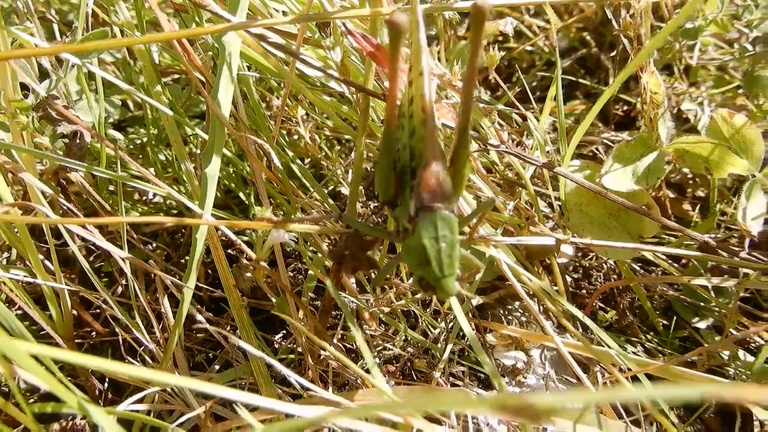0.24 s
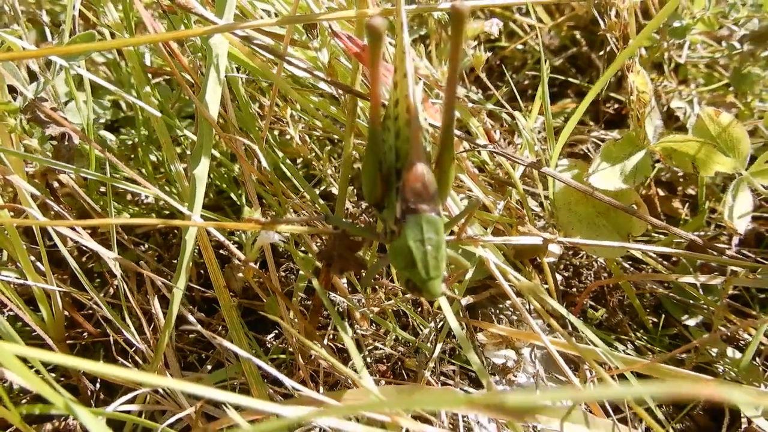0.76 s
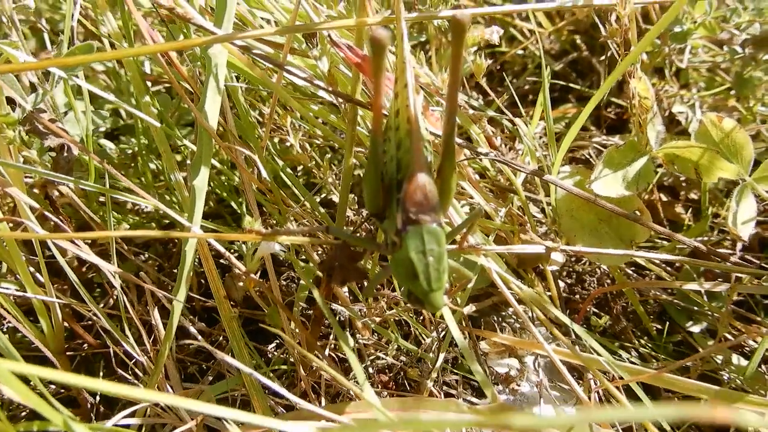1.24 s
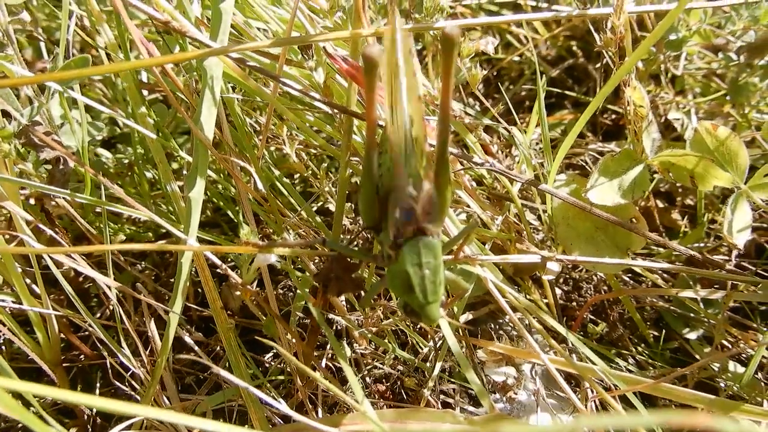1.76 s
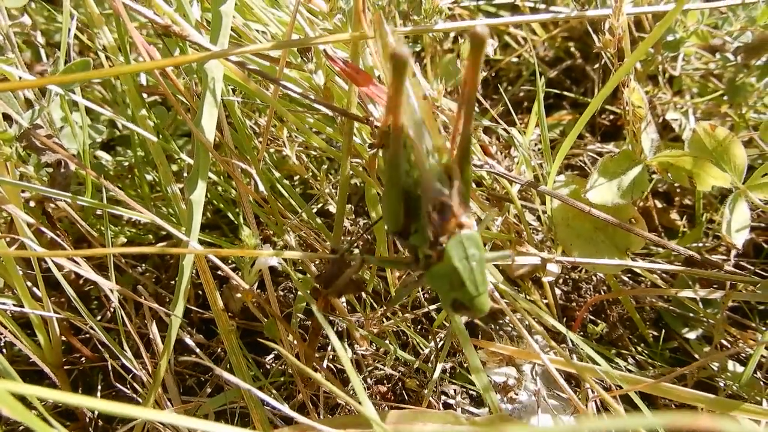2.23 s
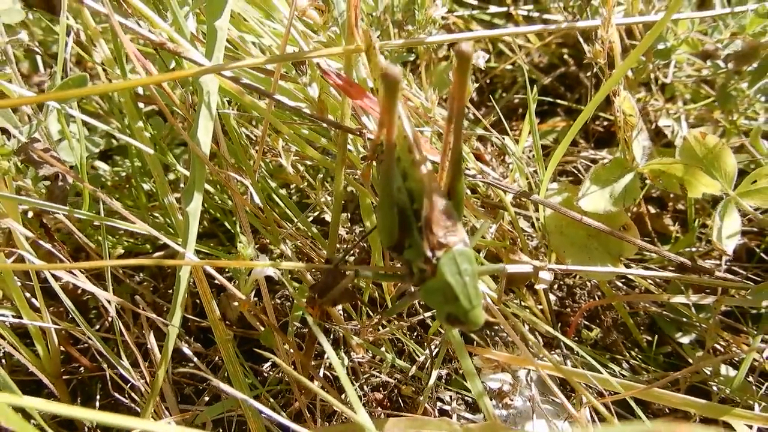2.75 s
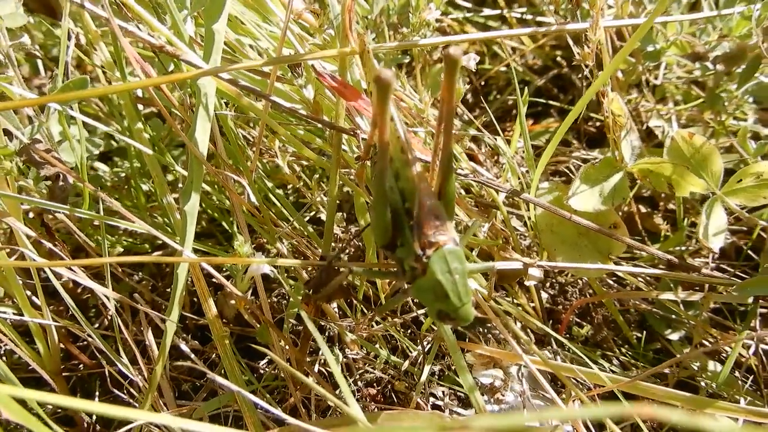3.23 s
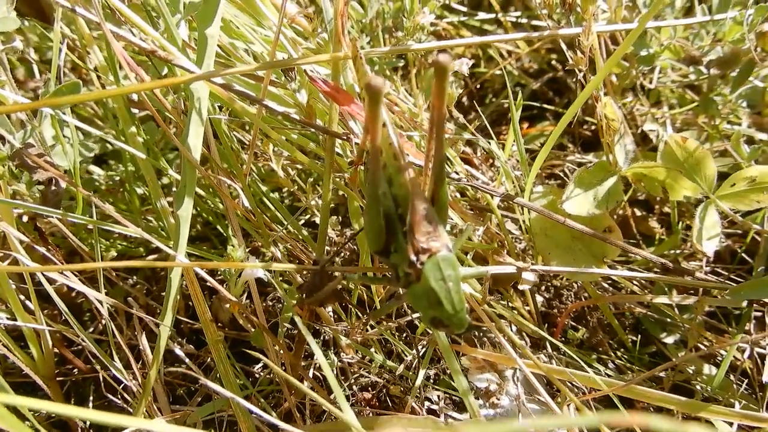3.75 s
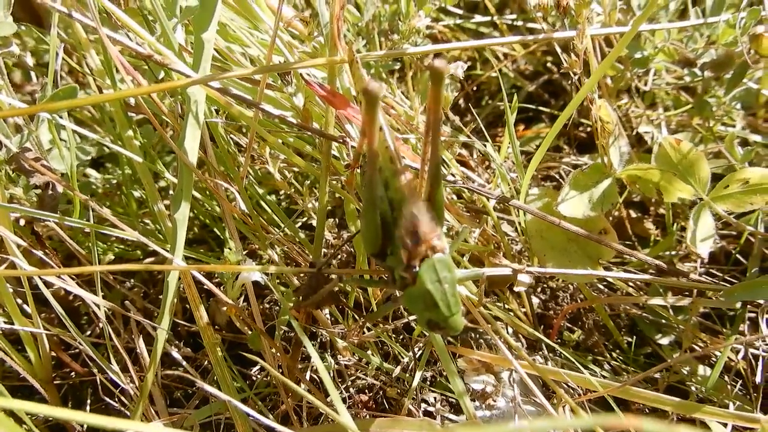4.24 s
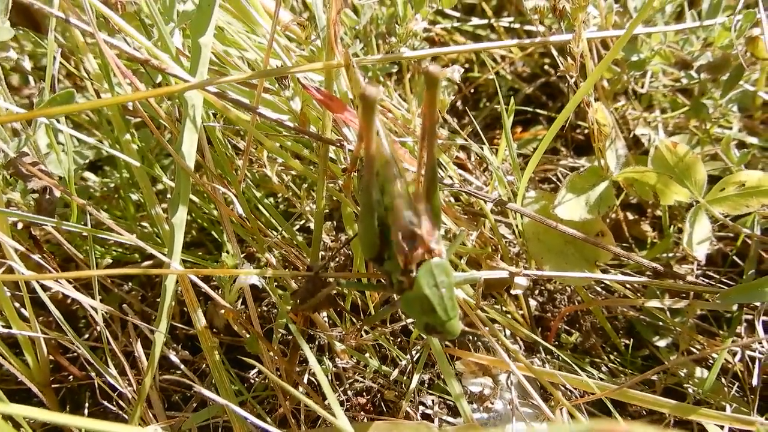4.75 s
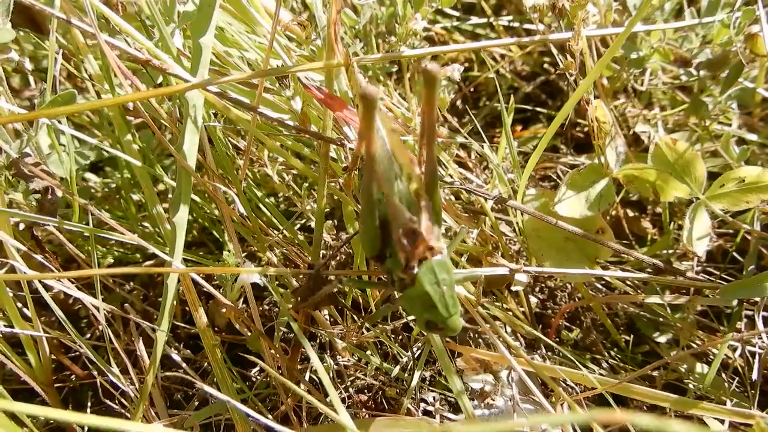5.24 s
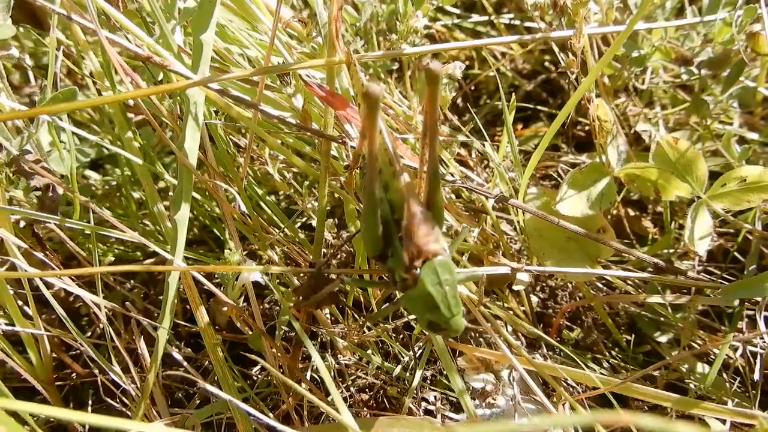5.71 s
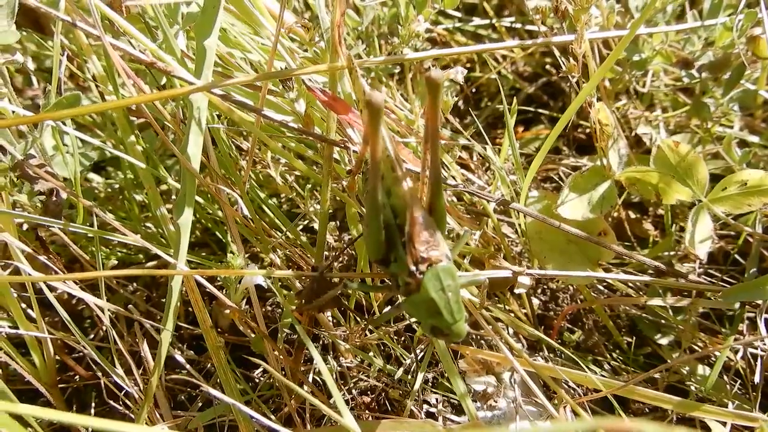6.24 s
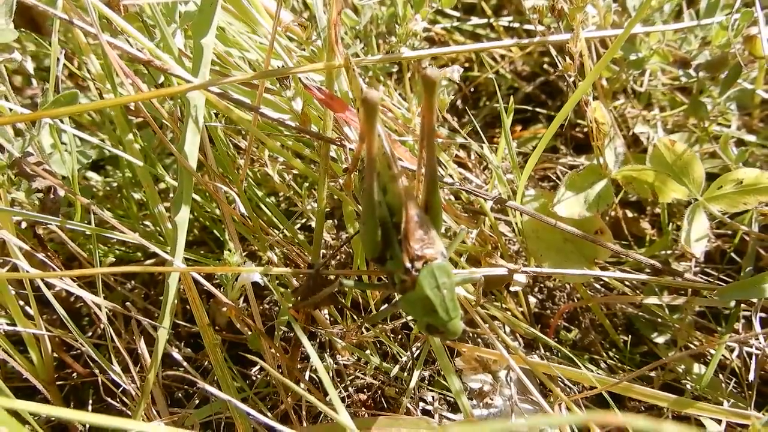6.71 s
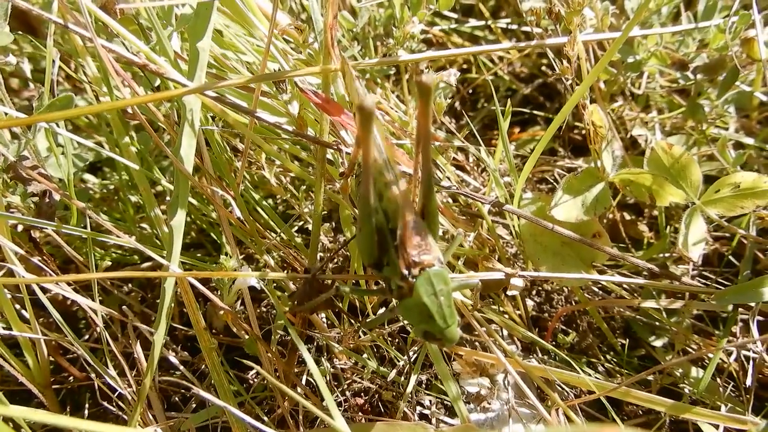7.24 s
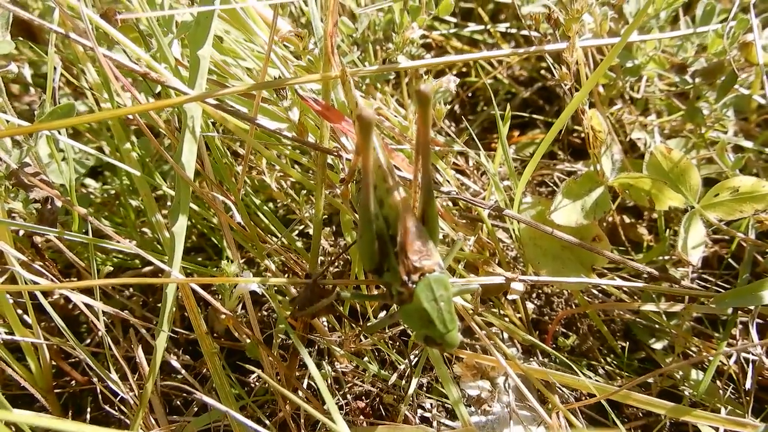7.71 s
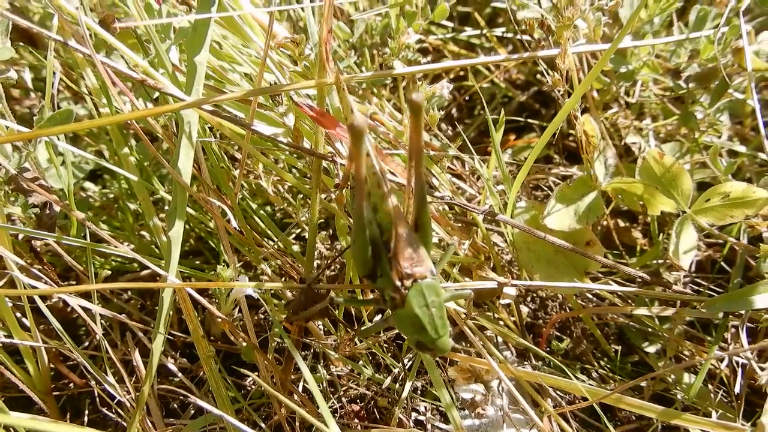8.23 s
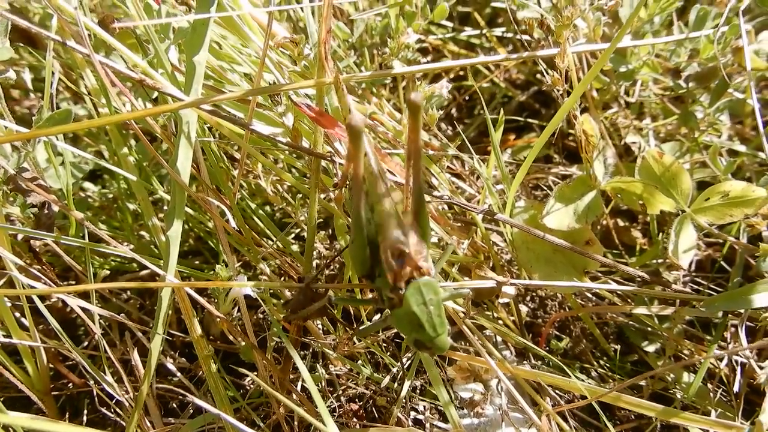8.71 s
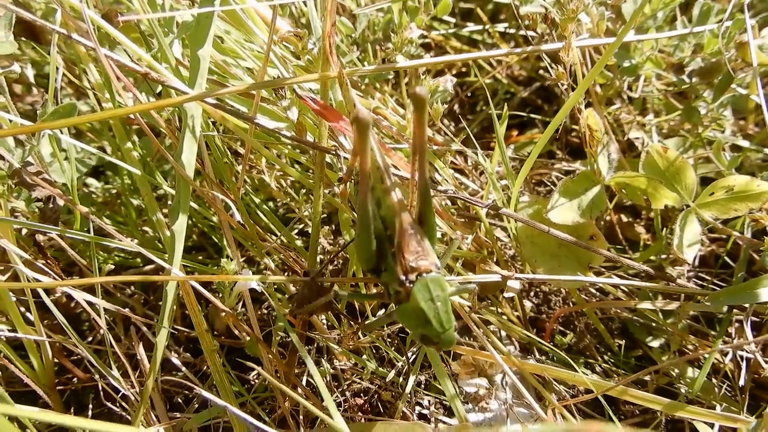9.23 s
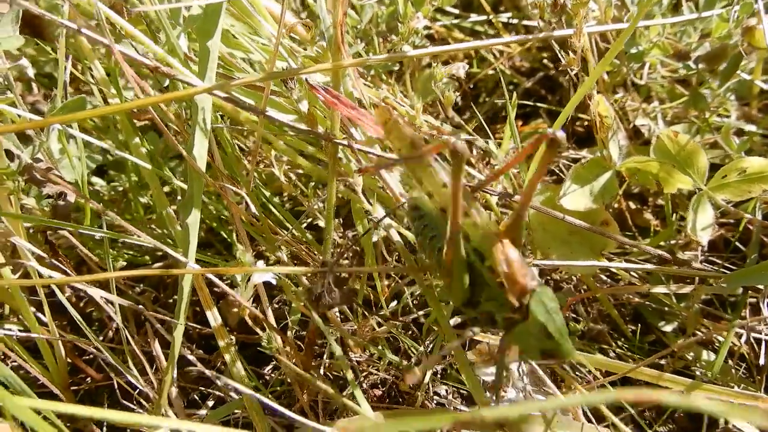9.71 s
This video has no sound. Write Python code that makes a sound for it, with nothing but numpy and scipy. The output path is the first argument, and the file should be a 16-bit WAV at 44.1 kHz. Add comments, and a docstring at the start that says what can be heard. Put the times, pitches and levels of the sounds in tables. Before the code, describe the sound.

Quiet open meadow, heard from very near the grass. After a sliver of silence, a short muffled rush of noise lasts until about 0.3 s, with a few tiny ticks and the first chirp near 0.26 s. A bush-cricket then chirps singly at 0.9, 1.1 and 1.5 s, each a very short, dry, noisy tick of very high pitch with a soft catch just before it. From 1.7 to 4 s the chirps draw together, from about five to seven a second; by 6 s they form a steady pulse of nearly nine a second, slightly varied in loudness. At 5.8 s a hard double crack snaps on the right, coinciding with a chirp. The pulse continues, with faint dry rasping between strokes, slowing slightly and softening by 9.8 s. Underneath, faint breeze gusts early and calms, while a distant engine hum swells slightly around 3 s.

```python
"""Bush-cricket in dry grass

Single chirps quicken to about nine a second: toothed-file stridulation, a soft opening and a loud closing.
Each tooth impulse excites the resonant wing; air puffs, dry rasps and grass scattering accompany the song.
A short noise rush starts the scene, and a clipped crack on the right coincides with one chirp.
Filtered noise gives the breeze and distant air; a wavering sinusoid gives a far engine."""
import sys
import numpy as np
from scipy import signal
from scipy.fft import rfft, irfft, next_fast_len
from scipy.io import wavfile
from scipy.ndimage import uniform_filter1d, map_coordinates

SR = 44100
rng = np.random.default_rng(int(sys.argv[2]) if len(sys.argv) > 2 else 0)


def transcribe(signal):
    """Save signal, clipped to [-1, 1], as a 16-bit WAV file at the path in sys.argv[1]."""
    frames = np.atleast_2d(signal).T
    limited = np.clip(frames, -1, 1)
    pcm = np.round(limited * 32767).astype(np.int16)
    wavfile.write(sys.argv[1], SR, pcm)


N = 439677
START_S = .06  # onset of the audible scene

# one wing cycle per chirp: t/s of the main closing stroke, level/dB before the closing gain
CHIRP_TIMES = [(0.2571, -19.5), (0.8869, -20.5), (1.1205, -21.5), (1.5469, -20.5), (1.741, -20),
               (1.9367, -21.5), (2.154, -20.5), (2.4151, -23.5), (2.589, -22.5), (2.811, -22),
               (2.9701, -21.5), (3.1294, -23.5), (3.2972, -21.5), (3.435, -23), (3.5806, -24),
               (3.723, -25.5), (3.8688, -23), (4.0062, -24), (4.1473, -23.6), (4.2884, -21.5),
               (4.4299, -21.5), (4.579, -23), (4.6993, -25), (4.8253, -23), (4.948, -23.5), (5.072, -21.5),
               (5.1886, -22.5), (5.3114, -23.0), (5.4247, -24.0), (5.5478, -21.5), (5.6737, -24),
               (5.7977, -22), (5.9131, -21), (6.0349, -24), (6.1452, -20.5), (6.2632, -23), (6.3749, -23),
               (6.4893, -23), (6.6003, -24.5), (6.7166, -23.0), (6.8287, -23.5), (6.9402, -22),
               (7.0537, -24), (7.166, -22), (7.2753, -23.5), (7.3862, -21), (7.4992, -22.5), (7.6097, -24),
               (7.7195, -22.5), (7.833, -23), (7.9417, -22.5), (8.0529, -22.5), (8.1547, -22), (8.263, -23),
               (8.3744, -23.5), (8.4769, -23.5), (8.584, -25.5), (8.6947, -21.6), (8.8021, -25.5),
               (8.9105, -24), (9.008, -21), (9.111, -22.8), (9.2235, -22.5), (9.3316, -23), (9.451, -23),
               (9.5688, -24), (9.6899, -28.5), (9.8236, -26)]
# breeze, gusting then steady, before layer gains: t/s, rumble level/dB, distant air level/dB, hiss level/dB
BREEZE_LEVELS = [(0.3, -78.5, -79, -97.5), (0.52, -79.5, -76.5, -94.5), (0.74, -77.5, -69, -83),
                 (1.08, -81.5, -76.5, -93), (1.42, -79.5, -70, -90), (2.14, -80, -76.5, -99.5),
                 (2.51, -82, -74.5, -89), (3.12, -82.5, -71.5, -83), (4.12, -84, -74.5, -87),
                 (5.2, -85, -74, -86.5)]


def cricket(cycles, opening_db=1, closing_db=-0.87, tint_db=2, lead_s=.0071, lead_length=.0031,
            main_length=0.0052):
    """Stridulation: opening catches, a short lead stroke and the main closing stroke excite the wing."""
    # catches of the file as the wings open: t/s from the strongest, length/s, relative level/dB
    catches = [(-.0195, 0.0039, -12), (-.0092, .0046, -18.5), (0, .0044, -2), (.0047, .0016, -19.5)]
    # extra wing strokes: early ticks, stray flicks and a last opening without a closing:
    # t/s, length/s, level/dB
    extra_strokes = [(.208, 0.0016, -23), (0.221, 0.0025, -22), (.836, 0.0048, -38), (0.854, .0024, -27.5),
                     (5.087, .0068, -39), (6.727, .005, -39), (7.171, 0.0042, -36), (9.115, 0.0049, -33),
                     (9.921, 0.0039, -48), (9.939, 0.0052, -35)]
    # spectrum of one tooth strike on the wing: f/Hz, level/dB
    wing_colour = [(200, -32), (400, -24.5), (750, -21.5), (1400, -36), (2200, -32), (2850, -32.5),
                   (4000, -41), (6500, -41), (8000, -23), (9500, -11.5), (10800, -2), (12300, -6),
                   (14500, 2), (15750, 1), (16050, -29.5)]
    # thinner spectrum of the opening stroke: f/Hz, level/dB relative to closing
    thin_colour = [(1000, -0.5), (7500, 6), (10500, -9), (12200, -15.5), (13500, -1.5), (16000, -1.5)]
    # shading of the highest partials in the right channel: f/Hz, level/dB
    shade = [(8000, 0), (11000, -1), (12500, -4), (14500, -11), (15800, -9)]
    song = np.zeros((2, N))
    half = .01  # s from the start of a stroke's track to its centre
    firm, soft, slow = .18, .3, .7  # bite of the scraper, as a share of stroke length
    tint_hz = np.linspace(1000, 16000, 16)
    for s, db, lead_db, before, open_db in cycles:
        # the wings never meet quite the same way twice, so each cycle has its own tint
        tint = np.transpose([tint_hz, tint_db * rng.standard_normal(len(tint_hz))])
        full = np.array([ringing([wing_colour, tint]), ringing([wing_colour, tint, shade])])
        thin = np.array([ringing([wing_colour, tint, thin_colour]),
                         ringing([wing_colour, tint, thin_colour, shade])])
        for offset, length, catch_db in catches:
            luck_db = 2 * rng.normal()  # every catch also varies in level
            gain = amp(opening_db + open_db + catch_db + luck_db)
            add(song, s - before + offset - half, gain * stroke(length, thin, soft, snap=0.65))
        # wing pressure changes from cycle to cycle, and with it the colour of the closing strokes
        closing = full + rng.uniform(-.3, .5) * (thin - full)
        lead = stroke(lead_length, closing, slow, snap=0.36)
        add(song, s - lead_s - half, amp(closing_db + lead_db) * lead)
        main = stroke(main_length, closing, firm, clump_db=1.5, snap=0)
        add(song, s - half, amp(closing_db + db) * main)
    plain = np.array([ringing([wing_colour]), ringing([wing_colour, shade])])
    for s, length, db in extra_strokes + light_flicks():
        add(song, s - half, amp(db) * stroke(length, plain, soft, snap=.3))
    return song


def stroke(length, wing, bite, tooth_hz=3800, jitter=.2, clump_db=2.5, snap=.8, count=80):
    """Impulse excitation: unevenly gripped teeth ring the wing, as the scraper bites in and slips off."""
    slip, scatter_db = .05, 2.5
    chance = rng.standard_normal((3, count))
    speed = np.exp(0.24 * rng.normal())  # no two strokes run equally fast
    t = (np.arange(count) - count / 2 + jitter * chance[0]) / (tooth_hz * speed)
    u = t / length
    bite_in = 1 + np.tanh((u + .5) / bite)
    slip_off = 1 + np.tanh((.45 - u) / slip)
    force = bite_in * slip_off
    last_teeth = np.exp(-((u - .35) / .1) ** 2)
    # neighbouring teeth share part of their grip
    grip = amp(clump_db * unit(uniform_filter1d(chance[2], size=3))) * (1 + snap * last_teeth)
    place = np.clip(np.round((t + .01) * SR), 0, SR // 50).astype(int)
    teeth = np.bincount(place, force * grip * amp(scatter_db * chance[1]))
    sound = np.array([np.convolve(teeth, channel) for channel in wing])
    # the left channel of every stroke carries the energy of 4.5 ms at rms 1
    return sound / np.sqrt(np.sum(sound[0] ** 2) / (.0045 * SR))


def wing_cycles(vary_db=1.5, vary_s=0.00028):
    """Rest-dependent drive: longer rest gives harder, wider cycles (s, dB, lead dB, opening lead s, dB)."""
    fast_pause_s, first_rest_s = .11, 0.96  # pause in the fast song; rest before the first chirp
    # values at the fast pause, then changes per second of extra rest
    lead_base_db, open_base_db, open_before_s = -29.5, -34, .0238
    lead_db_per_s, open_db_per_s, wider_s_per_s = 10, 17, 0.0054
    s, db = np.transpose(CHIRP_TIMES)
    rest = np.append(first_rest_s, np.diff(s)) - fast_pause_s
    luck = rng.standard_normal((len(s), 3)).T
    lead_db = lead_base_db + lead_db_per_s * rest + vary_db * luck[0]
    open_db = open_base_db + open_db_per_s * rest + vary_db * luck[1]
    before = open_before_s + wider_s_per_s * rest + vary_s * luck[2]
    return np.transpose([s, db, lead_db, before, open_db])


def light_flicks(share=0.13, after_s=.013, scatter_s=.003, length=0.0048, db=-50):
    """Random re-excitation: some wings tick again just after closing (rows of s, length s, dB)."""
    luck = rng.random((len(CHIRP_TIMES), 2))
    return [(s + after_s + scatter_s * (2 * u - 1), length, db)
            for (s, _), (p, u) in zip(CHIRP_TIMES, luck) if p < share]


def light_snags(share=0.21, below_db=-33, hz=3100, spread=0.096):
    """Random frictional catching: some closing strokes snag a little (rows of s, dB, Hz)."""
    luck = rng.random((len(CHIRP_TIMES), 2))
    return [(s, db + below_db, hz * (1 + spread * (2 * u - 1)))
            for (s, db), (p, u) in zip(CHIRP_TIMES, luck) if p < share]


def scuffs(rows, width, length):
    """Resonant filtering: short noise bursts in broad resonances (width as a share of frequency)."""
    track = np.zeros((2, N))
    half = .015  # s
    t = np.arange(2 * round(half * SR)) / SR - half
    f = np.fft.rfftfreq(len(t), 1 / SR)
    for s, db, hz in rows:
        resonance = 1 / (1 + ((f - hz) / (width * hz)) ** 2) ** 2
        rough = irfft(rfft(rng.standard_normal(len(t))) * resonance)
        burst = rough * np.exp(-(t / length) ** 2)
        add(track, s - half, amp(db) * burst / np.sqrt(np.sum(burst ** 2) / (length * SR)))
    return track


def wing_puffs(cycles, puff_hz=122, width=0.0048, puff_db=-33, lead_s=0.0062, vary_db=2):
    """Air displacement: each jerk of the wings pushes a little air in one low swing."""
    puffs = np.zeros(N)
    half = .015  # s
    t = np.arange(round(2 * half * SR)) / SR - half
    swing = -np.cos(2 * np.pi * puff_hz * t) * np.exp(-(t / width) ** 2)
    for s, db, lead_db, before, open_db in cycles:
        for when, size_db in [(s, db), (s - lead_s, lead_db), (s - before, open_db)]:
            add(puffs, when - half, amp(size_db + puff_db + vary_db * rng.normal()) * swing)
    return puffs * amp([[-1], [1]])  # channel balance, dB


def wing_rub(rub_db=-72, centre_s=0.017, reach_s=0.032, grain_db=3):
    """Sliding friction: a faint dry rasp around each wing cycle, stronger as the song warms up."""
    contact = np.zeros(N)
    t = np.arange(SR // 5) / SR
    touch = np.exp(-((t - t.mean()) / reach_s) ** 4)
    for s in np.transpose(CHIRP_TIMES)[0]:
        add(contact, s - centre_s - t.mean(), touch)
    warmth = level([(0, -4.5), (3, -3), (6.5, 5.5), (9.3, 7), (10, 0.5)])
    rasp_colour = [(100, -28), (1500, -10.5), (2800, 2.5), (4500, -6.5), (6500, -12), (8500, 1.5),
                   (16000, -6.0)]
    rasp = stereo_noise(rasp_colour, width=0.89)
    return amp(rub_db + grain_db * wobble(350) + 2.2 * wobble(28)) * warmth * contact * rasp


def grass(x, near_db=-16, far_db=-32, far_t60=.055):
    """Scattering: close blades return the song at once; stems further off leave a faint short tail."""
    t = np.arange(SR // 10) / SR
    near_t60 = .011  # s to decay by 60 dB
    echo = 0
    for db, t60 in [(near_db, near_t60), (far_db, far_t60)]:
        tail = rng.standard_normal((2, len(t))) * amp(-60 * t / t60)
        echo = echo + amp(db) * tail / np.linalg.norm(tail[0])
    # the shaded right channel hears a larger share of scattered sound
    return signal.fftconvolve(x, echo * amp([[0], [4]]), axes=1)[:, :N]


def crack(ring_hz=15690, beat_hz=62, leak_db=-44, rattle_db=-20, ring_db=-12, ring_s=5.814):
    """Overload and beating: two noise bursts on the right, a rattle between, then a very high ring."""
    # the two bursts: t/s, hold/s, level/dB before clipping, release/(dB per s)
    burst_rows = [(5.7961, .004, 1, 8999), (5.8093, 0.0017, 7, 3602)]
    # spectrum of the bursts: f/Hz, level/dB
    burst_colour = [(40, -12), (250, -13), (1050, -12), (1400, -20), (1950, -9.5), (2500, -15.5),
                    (3150, -4.5), (3700, -17), (6000, -16), (9000, -15), (11200, 4), (13000, -9.5),
                    (15650, 3), (16200, -11)]
    first_s = burst_rows[0][0]
    bursts = sum(amp(db) * envelope(s, hold, rise_db_per_s=24997.5, fall_db_per_s=fall)
                 for s, hold, db, fall in burst_rows)
    rattle = amp(rattle_db) * envelope(first_s, hold=0.0094, rise_db_per_s=13001.5, fall_db_per_s=15000.5)
    # the very slow rise leaves the onset alone; the fall cuts both bursts short
    cutoff = envelope(first_s, hold=.0215, rise_db_per_s=0.5, fall_db_per_s=30000.5)
    burst = (bursts + rattle) * cutoff * noise(burst_colour)
    t = clock() - ring_s
    pair = np.sin(2 * np.pi * ring_hz * t) + .6 * np.sin(2 * np.pi * (ring_hz + beat_hz) * t)
    ring = amp(ring_db) * envelope(ring_s, hold=.003, rise_db_per_s=11999, fall_db_per_s=901) * pair
    return np.array([amp(leak_db) * burst, burst + ring])


def breeze(low_db=4, calming_db_per_s=0.94, grass_db=0):
    """Broadband flow noise: a slowly calming rumble, nearly alike in both channels, and hiss in grass."""
    s, rumble_db, _, hiss_db = np.transpose(BREEZE_LEVELS)
    rumble_colour = [(20, -23.0), (45, -8.5), (70, 1.5), (110, -6.0), (200, -14.5), (600, -60.5)]
    hiss_colour = [(500, -27), (1300, -10), (1900, 1.5), (2900, -0.5), (3600, -19), (9000, -31)]
    rumble = stereo_noise(rumble_colour, width=0.34)
    hiss = stereo_noise(hiss_colour, width=0.13)
    flicker_db = 2.5 * wobble(15)
    rumble_gain = amp(low_db - calming_db_per_s * clock() + np.interp(clock(), s, rumble_db))
    hiss_gain = amp(grass_db + flicker_db + np.interp(clock(), s, hiss_db))
    return rumble_gain * rumble + hiss_gain * hiss


def meadow(drone_hz=124, waver=0.041, flutter_db=1, air_db=2.5, drone_db=-82, swell_db=6, swell_s=3.1,
           swell_reach_s=1, rush_db=-43):
    """Filtered noise and frequency modulation: distant air, a far engine swelling once, an initial rush."""
    # spectrum of the distant air: f/Hz, level/dB
    air_colour = [(25, -17.5), (70, 1), (130, 1), (250, 1), (500, -2.5), (900, -4), (1150, -10),
                  (1400, -25.5), (2900, -22), (3800, -38), (8000, -46), (16000, -40)]
    # spectrum of the initial rush: f/Hz, level/dB
    rush_colour = [(25, -17.5), (65, -8.5), (130, -5.5), (250, -13.5), (860, -16.5), (1370, -35),
                   (2350, -27.5), (6900, -37), (10000, -40), (13500, -48.5), (15400, -34), (16200, -55)]
    s, _, gust_db, _ = np.transpose(BREEZE_LEVELS)
    air_gain = amp(air_db + np.interp(clock(), s, gust_db) + flutter_db * wobble(2.5))
    air = air_gain * stereo_noise(air_colour, width=0.36)
    phase = 2 * np.pi * np.cumsum(drone_hz * (1 + waver * wobble(31))) / SR
    swell = np.exp(-((clock() - swell_s) / swell_reach_s) ** 4)
    unsteady_db = 2.5 * wobble(9)
    drone = amp(drone_db + swell_db * swell + unsteady_db) * np.sin(phase)
    rush_gain = amp(rush_db + 1.3 * wobble(80))
    rush_gain = rush_gain * envelope(START_S, hold=.14, rise_db_per_s=15000, fall_db_per_s=339.5)
    rush = rush_gain * stereo_noise(rush_colour, width=0.21)
    return (air + drone + rush) * amp([[1], [-1.5]])  # channel balance, dB


def amp(db):
    """Decibel law: amplitude ratio of a level in dB."""
    return 10 ** (np.asarray(db) / 20)


def unit(x):
    """Power normalization: scale to rms 1."""
    return x / np.sqrt(np.mean(x ** 2) + 1e-20)


def clock():
    """Uniform sampling: the time of every sample in s."""
    return np.arange(N) / SR


def along(points, hz):
    """Logarithmic frequency scale: interpolate (Hz, value) points."""
    f, v = np.transpose(points)
    return np.interp(np.log(hz + 1), np.log(f + 1), v)


def level(rows):
    """Linear interpolation in dB: gain from (s, dB) rows, -200 dB outside them."""
    s, db = np.transpose(rows)
    return amp(np.interp(clock(), s, db, left=-200, right=-200))


def envelope(s, hold, rise_db_per_s, fall_db_per_s):
    """Exponential growth and decay: gain rises to 1 at time s, holds, then dies away."""
    t = clock() - s
    return amp(rise_db_per_s * np.minimum(t, 0) - fall_db_per_s * np.maximum(t - hold, 0))


def wobble(rate):
    """Spline interpolation: a smooth random curve, rate knots a second."""
    return map_coordinates(rng.standard_normal(int(N * rate / SR) + 4), [clock() * rate])


def filtered(x, response):
    """Linear filtering: multiply the spectrum by a response of frequency."""
    m = next_fast_len(N + SR // 2)
    return irfft(rfft(x, m) * response(np.fft.rfftfreq(m, 1 / SR)), m)[..., :N]


def noise(colour):
    """Spectral shaping: coloured noise of rms 1."""
    return unit(filtered(rng.standard_normal(N), lambda hz: amp(along(colour, hz))))


def stereo_noise(colour, width):
    """Partial coherence: coloured noise, partly unlike in the two channels."""
    mid, side = noise(colour), width * noise(colour)
    return unit(np.array([mid + side, mid - side]))


def ringing(colours, size=512):
    """Minimum phase: folding the cepstrum gives a causal impulse response of colours in series."""
    hz = np.fft.rfftfreq(size, 1 / SR)
    cepstrum = irfft(np.log(amp(sum(along(c, hz) for c in colours))))
    cepstrum[1:size // 2] *= 2
    cepstrum[size // 2 + 1:] = 0
    return irfft(np.exp(rfft(cepstrum)))[:size // 2]


def add(track, s, sound):
    """Superposition: mix a sound into a track from time s."""
    part = track[..., max(round(s * SR), 0):][..., :sound.shape[-1]]
    part += sound[..., :part.shape[-1]]


def scene():
    """Superposition: the cricket, its scattered sound, the crack and the background add linearly."""
    # hardest snags of the scraper, heard as a lower rasp: t/s, level/dB, f/Hz
    snags = [(.208, -23, 8280), (.221, -47.5, 3300), (.23, -48.5, 4660), (.258, -52.5, 3420),
             (4.284, -55.5, 2610), (6.828, -43.5, 3560), (6.94, -49, 3940), (7.175, -52.5, 3230),
             (9.008, -50.5, 3270), (9.112, -46, 5030)]
    # light knocks on a stem: t/s, level/dB, f/Hz
    knocks = [(3.187, -52, 1260), (3.187, -52, 440), (3.185, -58, 4900), (3.345, -60, 456)]
    cycles = wing_cycles()
    song = cricket(cycles) + scuffs(snags + light_snags(), width=0.15, length=0.002)
    stem = scuffs(knocks, width=.55, length=.0045)
    return song + grass(song) + wing_puffs(cycles) + wing_rub() + stem + crack() + meadow() + breeze()


def record(dry):
    """Saturation and band limiting: silence before the onset, clipping at full scale, then a low-pass."""
    top_hz = 16575  # half-amplitude point of the low-pass
    clipped = np.clip(dry * (clock() > START_S), -1, 1)
    return filtered(clipped, lambda hz: (1 - np.tanh((hz - top_hz) / 200)) / 2)


dry = scene()
out = record(dry)
transcribe(out)
```